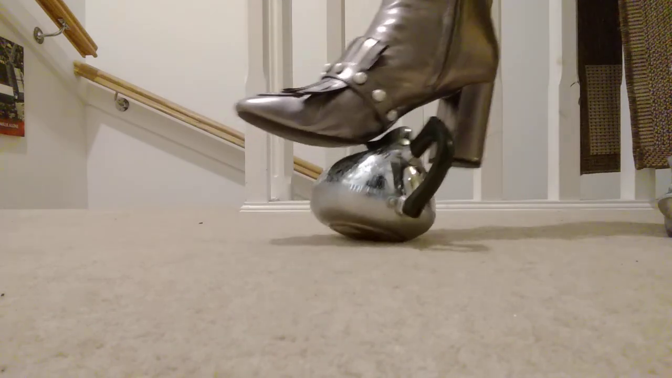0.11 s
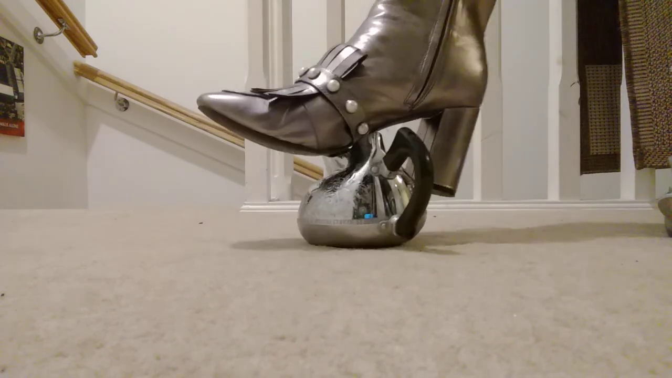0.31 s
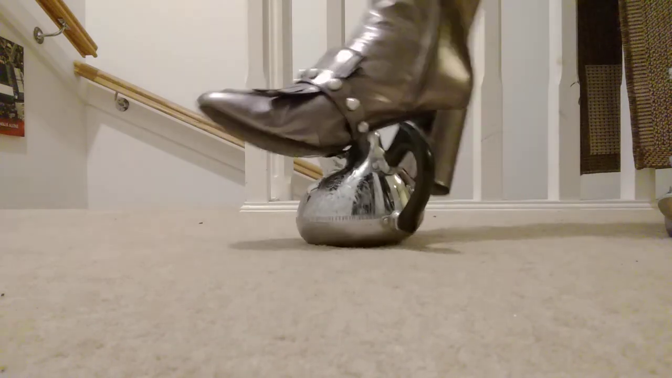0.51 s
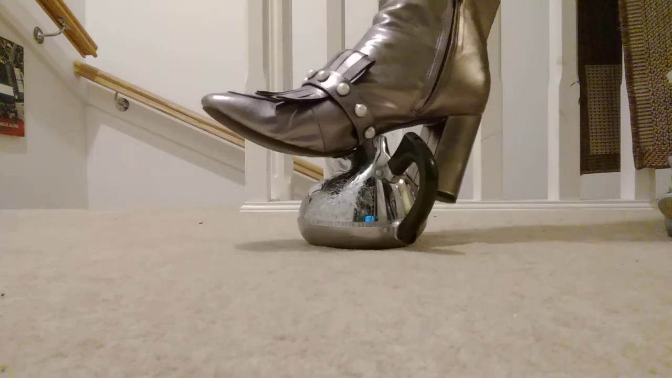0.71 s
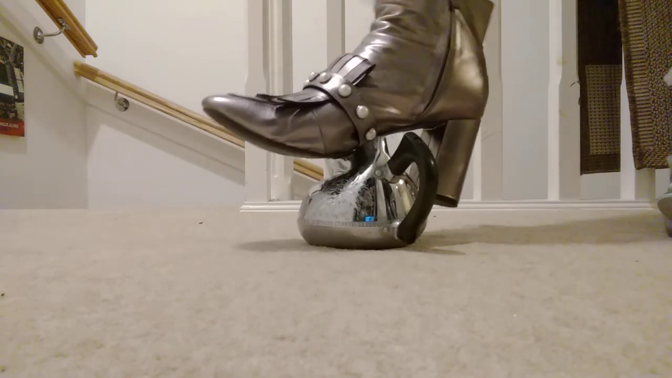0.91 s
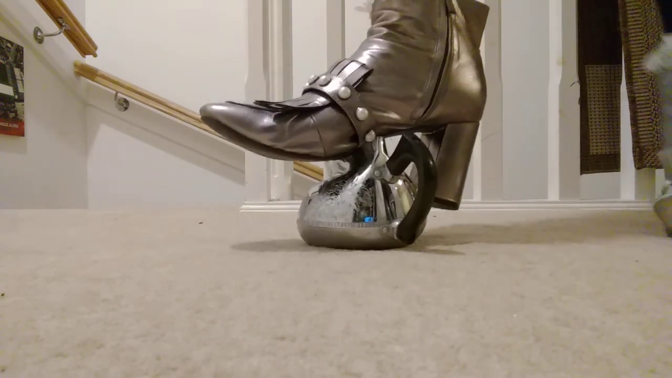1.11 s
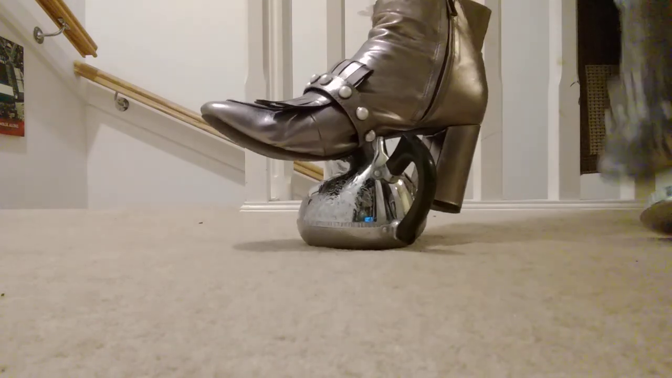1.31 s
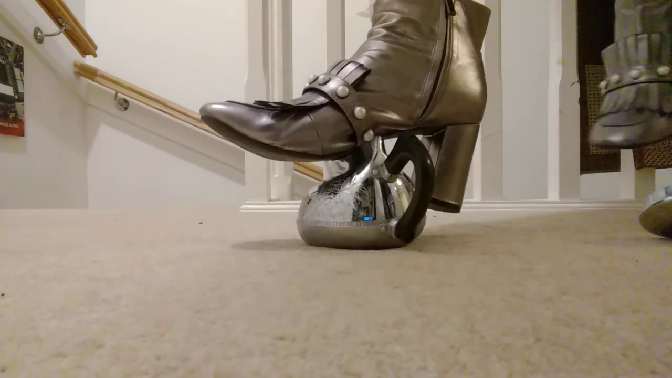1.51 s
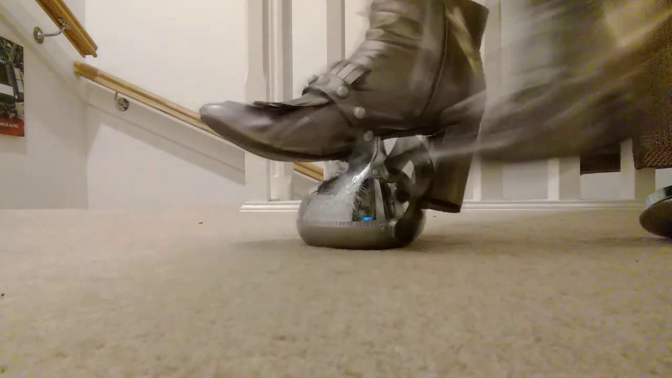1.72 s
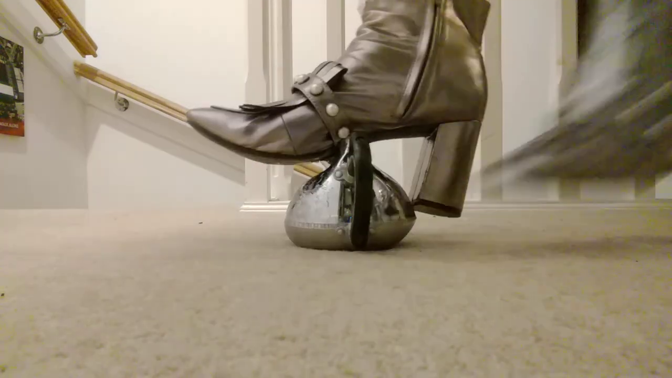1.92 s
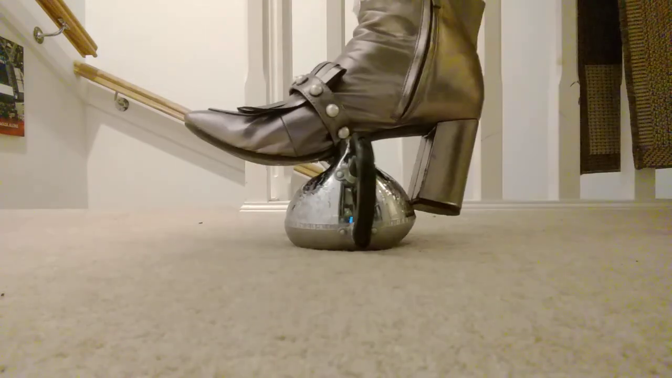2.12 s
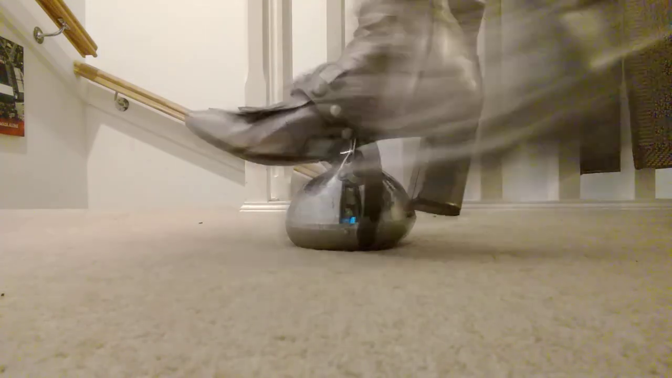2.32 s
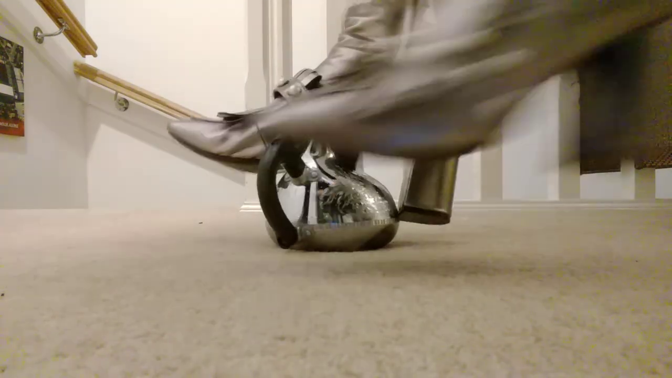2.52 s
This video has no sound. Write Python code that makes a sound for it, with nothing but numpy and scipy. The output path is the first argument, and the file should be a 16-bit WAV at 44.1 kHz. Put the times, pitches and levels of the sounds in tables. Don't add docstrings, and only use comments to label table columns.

```python
import sys
import numpy as np
from scipy import signal
from scipy.fft import rfft, irfft
from scipy.io import wavfile
from scipy.ndimage import uniform_filter1d

SR = 44100
rng = np.random.default_rng(int(sys.argv[2]) if len(sys.argv) > 2 else 0)


def output_pcm(signal):
    pcm = np.clip(np.atleast_2d(signal).T, -1, 1) * 32767
    wavfile.write(sys.argv[1], SR, np.round(pcm).astype(np.int16))


def invert_db(x):
    u = np.asarray(x, float) / 20
    return 10 ** u


N = 114660

# start_s, tick_db, body_db, cavity_delay_s, floor_delay_s
STAMPS = [
    (.1326, -32, -32, 0.0016, 0.0046),
    (.2039, -9.5, -7, -.0005, 0.0029),
]
FIRST_KICK = [
    (1.7154, -3.5, -3.5, 0.00359, .0062),
]
LAST_KICK = [
    (2.314, -7, -3.5, .0033, 0.0047),
]
# pitch_hz, level_db, t60_s, left_minus_right_db
PINNED_MODES = [(89.4, -9.5, 0.176, 0), (145, 7, 0.037, 10.5), (394, 3.5, 0.06, -3), (366, -38, 0.55, -7),
                (379.6, -12, 0.14, -5.5), (683, -6.5, .025, -4), (960, -1, 0.0069, 2),
                (1111, -7, 0.0085, -3.5), (466, -11.5, .05, 1), (2620, -20.5, 0.022, -19.5)]
STRUCK_MODES = [(94, -20.5, .15, 7.5), (165.4, 1.5, 0.037, 6), (340.6, 6.5, 0.015, 5),
                (787.5, -2.5, 0.017, 3.5), (1121, 6.5, 0.008, -5.5), (1400, 3.5, 0.0045, -6.5),
                (2900, -5.5, .006, -8), (518, 2, 0.012, 6), (1945, -7, 0.0027, -11.5)]
DENTED_MODES = [(91, -18, 0.14, 3.5), (158.4, 1.5, 0.033, 6), (358, 7, 0.015, 9), (682, -10.5, 0.02, 4),
                (907, -7.5, .014, -9.5), (1088, 7.5, 0.0064, -4), (1320, 10.5, 0.003, -19.5),
                (2100, -9, 0.0022, -8), (3080, -9.5, 0.005, -10)]
# freq_hz, level_db
CRUNCH_TONE = [(60, -6), (200, 15), (600, 4), (1500, -12), (2200, -20), (7000, -36.5), (12000, -22.5),
               (14200, -30), (14700, -66)]
# freq_hz, level_db
TICK_TONE = [(2000, -10.5), (4000, -26), (7000, -22.5), (9500, -14.5), (10700, -4), (12000, -1.5),
             (14600, -19), (16300, -71)]
# pitch_hz, level_db, t60_s
PORT_RING = [(10690, -8, 0.01), (13230, -7.5, 0.013), (12400, -14, 0.0069)]
# start_s, tick_db, knock_db, pitch_hz
KNOCKS = [(0.1331, -45.5, -37.5, 1261), (0.278, -51, -61, 387), (0.3003, -47, -50.5, 1400),
          (0.366, -56.5, -53, 1250), (0.563, -45, -66, 1246), (0.573, -67.5, -49.5, 1134),
          (0.7286, -50, -58.5, 1030), (0.809, -69, -67, 399.3), (0.841, -47, -59, 1400),
          (1.7454, -36, -51, 508.5), (1.802, -39, -47.5, 862), (1.8292, -44.5, -38.5, 600),
          (1.837, -52, -51, 2100), (1.859, -43, -51, 2060), (1.868, -53, -50, 2080),
          (1.801, -58, -54, 6020), (1.813, -50, -40, 298), (1.846, -50.5, -50, 4740),
          (2.3104, -53, -51.5, 1400), (0.135, -50.5, -41.5, 3400), (0.137, -56.5, -38, 2350),
          (0.224, -42.5, -21, 385), (.25, -57, -40, 843), (.243, -54, -25, 390), (.222, -60, -37, 720),
          (2.329, -48.5, -46.5, 3600), (2.33, -34, -29, 436), (2.357, -51, -51, 347),
          (1.802, -62.5, -64, 3400), (1.828, -53, -63, 4530), (1.834, -60.5, -50, 4400),
          (1.868, -57, -63, 3300), (0.616, -66, -48, 327.7), (2.337, -68, -29.5, 299)]
# start_s, level_db, pitch_hz, length_s
THUMPS = [(.134, -45, 406, .03), (0.308, -41.5, 354.6, 0.024), (.36, -49.5, 375, 0.052),
          (0.469, -60.5, 374, 0.09), (0.617, -39, 168, 0.012), (0.669, -51, 188, 0.021),
          (0.72, -54, 170, 0.037), (.785, -41.5, 145, 0.069), (0.854, -37, 151.3, 0.025),
          (1.04, -46.5, 219, 0.038), (1.081, -36, 109, 0.015), (1.15, -46, 138, 0.042),
          (2.183, -56.5, 117, 0.023), (2.26, -70, 110, 0.058)]
# freq_hz, level_db
SPRAY_TONE = [(1500, -44), (2800, -14), (4000, -8), (6000, -18.5), (8500, -13.5), (10500, 4), (13500, -3.5)]
# start_s, level_db, t60_s
SPRAYS = [
    (0.133, -56, .25),
    (0.203, -35.5, .17),
    (1.717, -40, .13),
    (1.825, -57.5, .16),
    (2.315, -38, 0.23),
]
# start_s, pitch_hz,
# level_db, rise_s, t60_s
LID_NOTES = [(1.855, 1529, -51, .06, .34), (1.9302, 1529, -55, .05, .24), (1.861, 2756, -60, .012, .25),
             (1.853, 4619, -52, .004, .045), (1.898, 4619, -58, .014, .1), (1.824, 2080, -51, .005, .08),
             (1.858, 2090, -55, .003, .04), (1.834, 7700, -62, .002, .03), (1.844, 7650, -62, .002, .04),
             (1.83, 12500, -62, .003, .07), (1.857, 10550, -54, .002, .03), (1.745, 10500, -48, .002, .03)]
# freq_hz, t60_s
LANDING_T60 = [(100, 0.48), (400, 0.34), (1200, 0.38), (4000, 0.45), (12000, .14)]
# freq_hz, level_db
LANDING_LEVEL = [(80, -5), (400, -15.5), (1200, -22), (3000, -30.5), (8000, -23.5), (13000, -31)]
# time_s, air_db, cloth_db
BED_LEVELS = [(0, -58.5, -58), (0.118, -60.5, -61.5), (0.187, -49.5, -44), (.25, -64, -44.5),
              (.34, -64, -63.5), (.8, -61.5, -66.5), (1.0, -58.5, -58), (1.12, -57.5, -52),
              (1.249, -60.5, -59.5), (1.57, -61, -64), (1.72, -58, -61), (1.842, -66.5, -50),
              (1.982, -69, -74.5), (2.28, -69.5, -82), (2.6, -70.5, -72.5)]
# freq_hz, level_db
AIR_TONE = [(45, -11), (90, 7), (150, 5.5), (300, -8), (1000, -19), (4000, -22), (9000, -22),
            (12500, -16.5)]
# freq_hz, left_minus_right_db
AIR_PAN = [(100, 2.5), (1000, -4.5), (8000, -2.5), (14000, -8.5)]
# freq_hz, correlation
AIR_LIKENESS = [(80, 0.092), (300, 0.34), (1000, 0.15), (2000, 0), (14000, 0.037)]
# freq_hz, level_db
RUSTLE_TONE = [(80, -9), (200, 7), (600, 1), (1500, -7), (2500, -32), (9000, -22), (12000, -9.5)]
# pitch_hz, level_db
WHINES = [(11690, -77), (14000, -88.5)]
# freq_hz, share
CROSS_FEED = [(100, 0.49), (350, 0.86), (1200, 0.47), (2400, 0.72), (3600, 0.58), (4800, 0.72),
              (6000, 0.56), (8000, 0.21), (14000, 0.31)]

RISE_CYCLES = 0.5
TICK_PAN_DB, TICK_LAG = -13.5, 14
BODY_LAG = 6


def read(points, hz):
    f, v = np.transpose(points)
    return np.interp(np.log(hz + 1), np.log(f + 1), v)


def evened(x):
    return x / np.sqrt(np.mean(x ** 2) + 1e-20)


def colour(x, points):
    n = x.shape[-1]
    gain = invert_db(read(points, np.fft.rfftfreq(n, 1 / SR)))
    return irfft(rfft(x) * gain, n)


def add(mix, start_s, sound, pan_db, left_lag=BODY_LAG):
    for ch, lag in enumerate((int(left_lag), 0)[:len(mix)]):
        part = mix[ch, round(start_s * SR) + lag:][:len(sound)]
        part += sound[:len(part)] * invert_db(pan_db / 2 * (1.5 - 2 * ch))


def ring(hz, db, t60, rise):
    t = np.arange(int(SR * (t60 + 3 * rise))) / SR
    swell = (1 - np.exp(-t / rise)) ** 2
    return invert_db(db - 60 * t / t60) * swell * np.sin(2 * np.pi * hz * t)


def puff(points, db, rise, t60):
    t = np.arange(SR // 4) / SR
    noise = evened(colour(rng.standard_normal(len(t)), points))
    return noise * np.minimum(t / rise, 1) * invert_db(db - 60 * t / t60)


def tick(db):
    out = puff(TICK_TONE, db - 5, rise=0.00039, t60=0.01)
    for hz, ring_db, t60 in PORT_RING:
        port = ring(hz * rng.uniform(1.0, 1.02), db + ring_db, t60, rise=0.00014)
        add(out[None], 0, port, 0, 0)
    return out


def blows():
    out = np.zeros((2, N))
    for rows, modes in ((STAMPS, PINNED_MODES), (FIRST_KICK, STRUCK_MODES), (LAST_KICK, DENTED_MODES)):
        for start_s, tick_db, body_db, cavity_s, floor_s in rows:
            add(out, start_s, tick(tick_db), TICK_PAN_DB, TICK_LAG)
            add(out, start_s, puff(CRUNCH_TONE, body_db - 21.5, rise=0.0027, t60=0.16), 1.5)
            for hz, db, t60, pan_db in modes:
                if hz < 250:
                    delay_s = floor_s
                elif hz < 500:
                    delay_s = cavity_s
                else:
                    delay_s = 0
                mode = ring(hz, db + body_db, t60, RISE_CYCLES / hz)
                add(out, start_s + delay_s, mode, pan_db)
    return out


def knocks(out):
    for start_s, tick_db, db, hz in KNOCKS:
        contact = tick(tick_db + 6.0) + puff(TICK_TONE, tick_db - 4.5, rise=0.0028, t60=0.039)
        add(out, start_s, contact, TICK_PAN_DB, TICK_LAG)
        knock = ring(hz, db + 11, 9.1 / hz, RISE_CYCLES / hz)
        add(out, start_s, knock, -1.5, BODY_LAG * (1 + (hz > 3000)))


def thumps(out):
    for start_s, db, hz, length in THUMPS:
        board_tone = [(hz / 3, -14), (hz, 0), (3 * hz, -14), (9 * hz, -40), (9000, -75)]
        add(out, start_s, puff(board_tone, db - 5, 0.29 * length, 4 * length), 3.0)
        add(out, start_s, ring(hz, db + 13, 3 * length, 0.22 * length), 3.0)


def sprays(out):
    for start_s, db, t60 in SPRAYS:
        for side in (out[:1], out[1:]):
            add(side, start_s, puff(SPRAY_TONE, db, 0.0019, t60), 0, 0)


def lid(out):
    for start_s, hz, db, rise, t60 in LID_NOTES:
        add(out, start_s, ring(hz, db + 8, t60, rise), 0, 0)


def small_sounds():
    out = np.zeros((2, N))
    knocks(out)
    thumps(out)
    sprays(out)
    lid(out)
    return out


def landing(x):
    taps = np.zeros((2, SR // 2))
    slots = np.arange(300, SR // 2 - 20, 20)
    at = slots + rng.integers(0, 20, (2, len(slots)))
    np.put_along_axis(taps, at, rng.choice([-1., 1.], at.shape), 1)
    taps += 0.43 * taps[::-1]
    hz, t, z = signal.stft(taps, SR, nperseg=256)
    t60 = read(LANDING_T60, hz)[:, None]
    z = z * invert_db(-60 * t / t60 + read(LANDING_LEVEL, hz)[:, None]) / np.sqrt(t60 * 160)
    tail = signal.istft(z, SR, nperseg=256)[1]
    return signal.fftconvolve(x.mean(0)[None], tail, axes=1)[:, :N]


def room_air():
    frames, hz = N // 256 + 5, np.fft.rfftfreq(1024, 1 / SR)
    a, b, c, d, patches = rng.standard_normal((frames, 513, 5)).T
    patches = uniform_filter1d(patches, size=10, axis=0)
    patches = evened(uniform_filter1d(patches, size=10, axis=1))
    same = np.clip(read(AIR_LIKENESS, hz), -1, 1)[:, None]
    left = a + 1j * b
    right = same * left + np.sqrt(1 - same ** 2) * (c + 1j * d)
    z = np.array([left, right])
    z *= invert_db(read(AIR_PAN, hz) * np.array([[.5], [-.5]]))[..., None]
    z *= invert_db(read(AIR_TONE, hz)[:, None] + 3.5 * patches)
    return evened(signal.istft(z, nperseg=1024, noverlap=768)[1][:, :N])


def cloth_rustle():
    clumps = evened(uniform_filter1d(rng.standard_normal(N), size=500))
    grit = rng.standard_normal((3, N)) * invert_db(1.2 * clumps)
    return evened(colour(grit[:2] * 1.2 + grit[2], RUSTLE_TONE))


def bed():
    t = np.arange(N) / SR
    time_s, air_db, cloth_db = np.transpose(BED_LEVELS)
    air = invert_db(9) * room_air()
    cloth = cloth_rustle()
    whine = sum(invert_db(db + 67.5) * np.sin(2 * np.pi * hz * t) for hz, db in WHINES)
    air_gain = invert_db(np.interp(t, time_s, air_db))
    cloth_gain = invert_db(np.interp(t, time_s, cloth_db))
    return (air + whine) * air_gain + cloth * cloth_gain


def edged(x, db):
    hz = np.fft.rfftfreq(N, 1 / SR)
    slope = np.clip((hz - 14300) / 150 + .5, 0, 1)
    return irfft(rfft(x) * invert_db(db * slope), N)


def scene():
    near = blows() + edged(small_sounds(), db=-36.5)
    return near + edged(landing(near) + bed(), db=-45)


def low_pass(x):
    return signal.sosfilt(signal.butter(12, 16040, fs=SR, output="sos"), x)


def record(dry):
    hz = np.fft.rfftfreq(N, 1 / SR)
    rumble_cut = (hz ** 2 / (hz ** 2 + 40 ** 2)) ** 2
    z = rfft(edged(dry, db=-11)) * rumble_cut
    delay = np.exp(-2j * np.pi * hz * 0.000424)
    z = z - np.clip(read(CROSS_FEED, hz), 0, 1) * delay * z[::-1]
    mix = np.clip(irfft(z, N), -1, 1)
    return low_pass(mix)


dry = scene()
out = record(dry)
output_pcm(out)
```